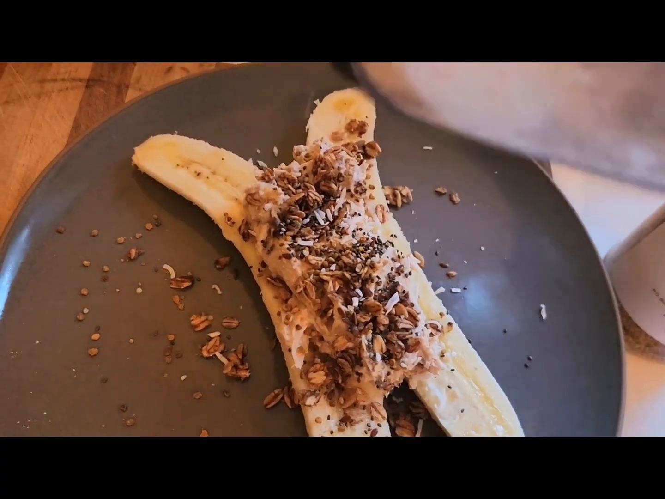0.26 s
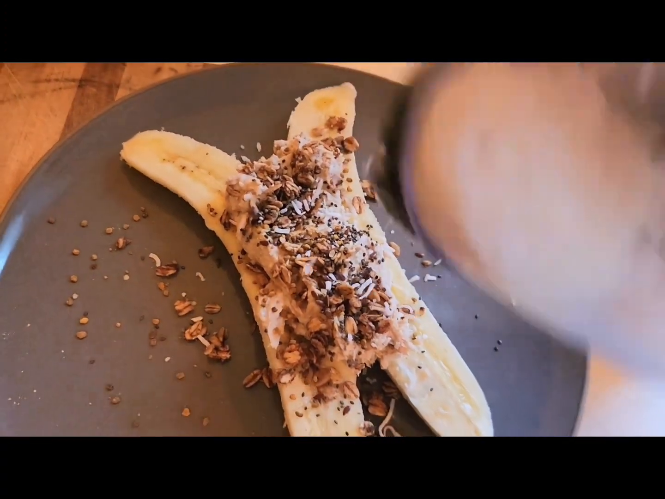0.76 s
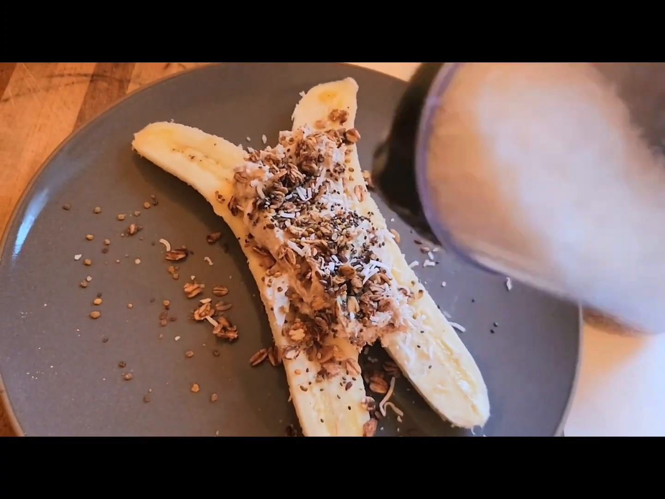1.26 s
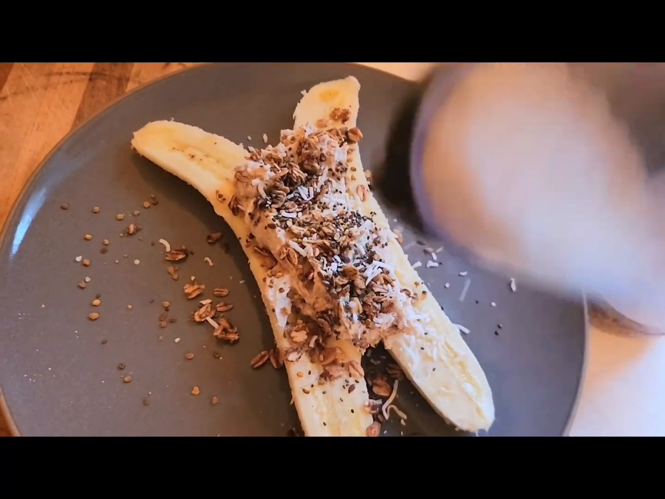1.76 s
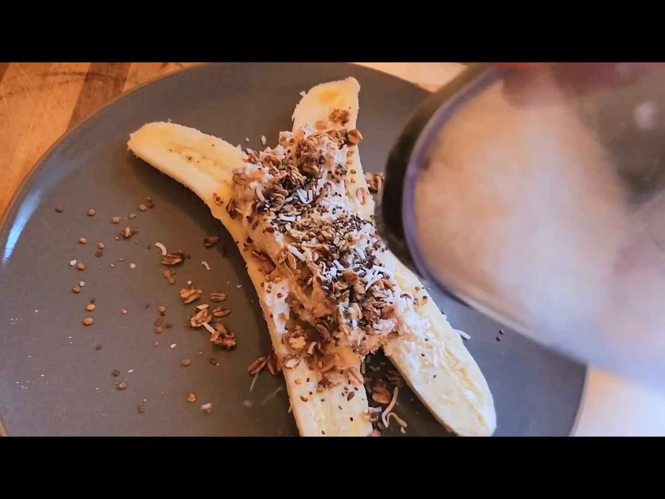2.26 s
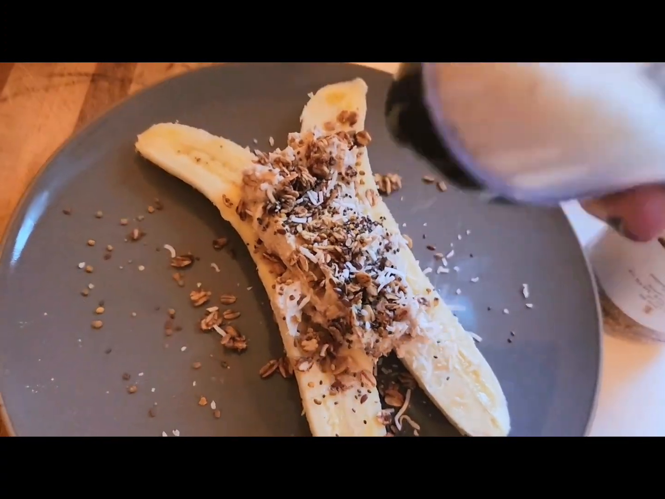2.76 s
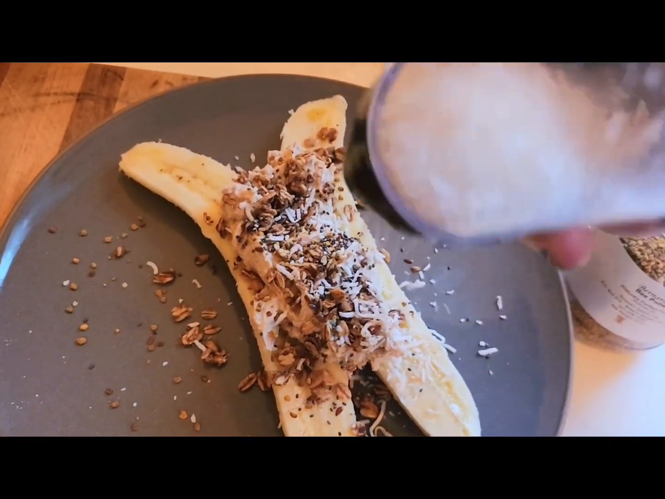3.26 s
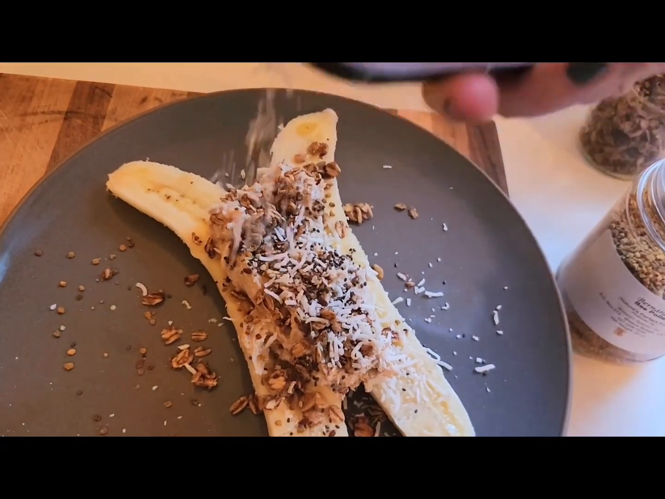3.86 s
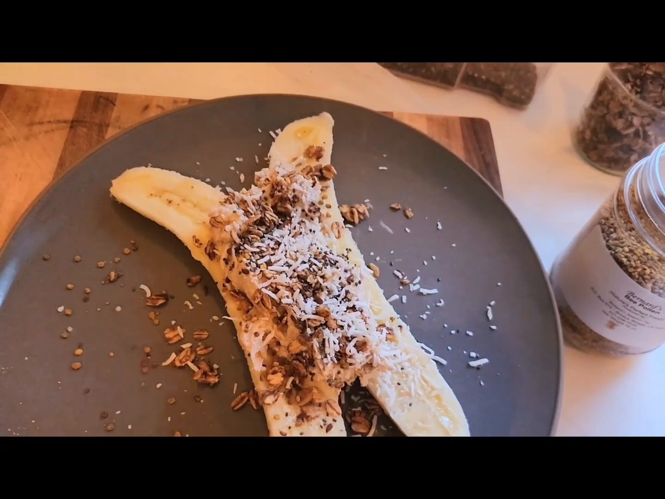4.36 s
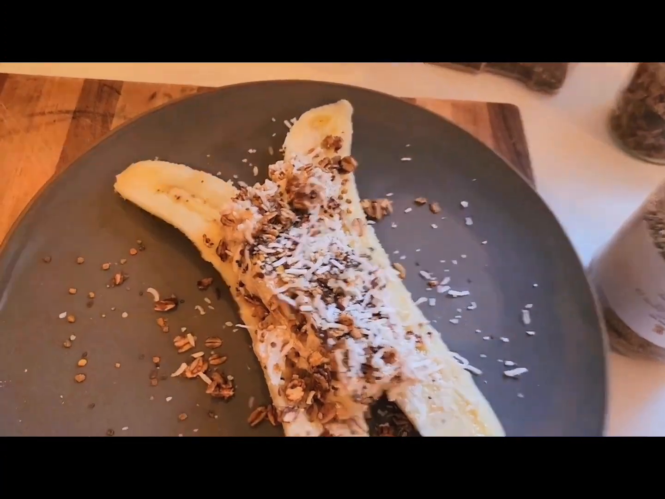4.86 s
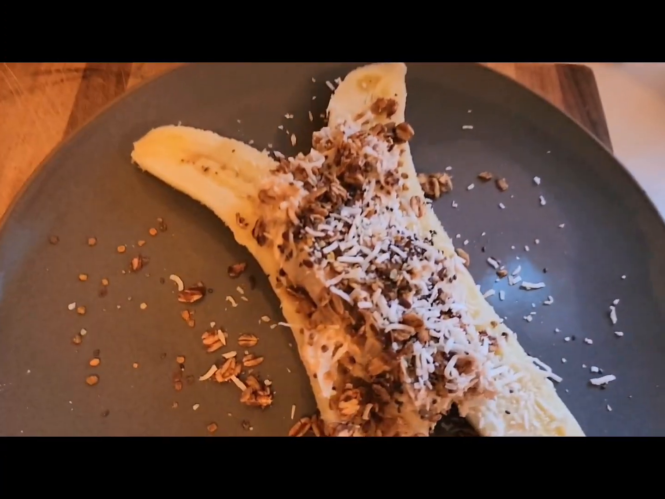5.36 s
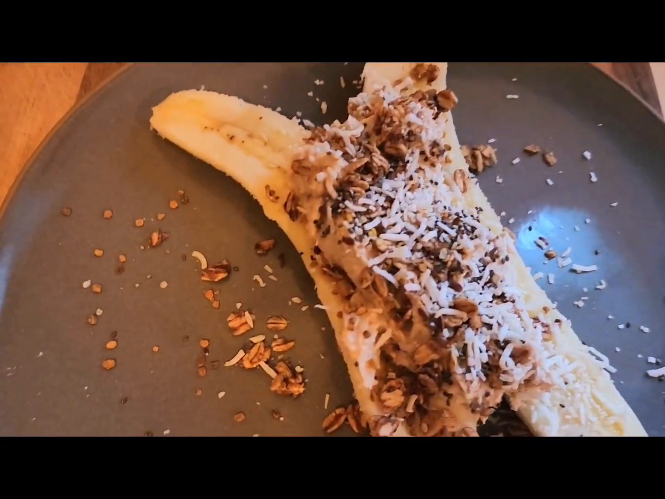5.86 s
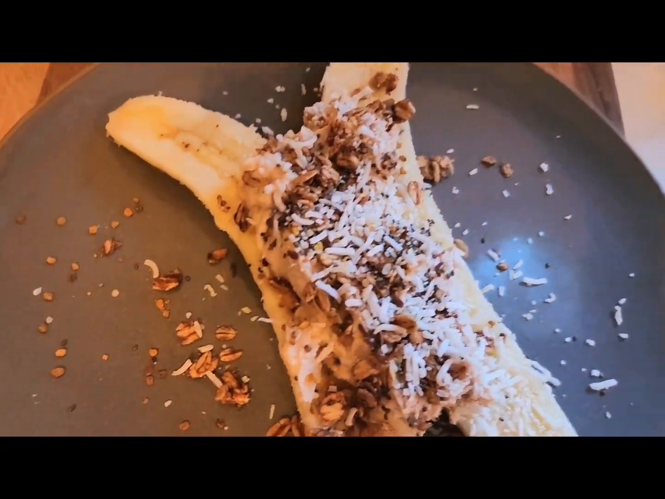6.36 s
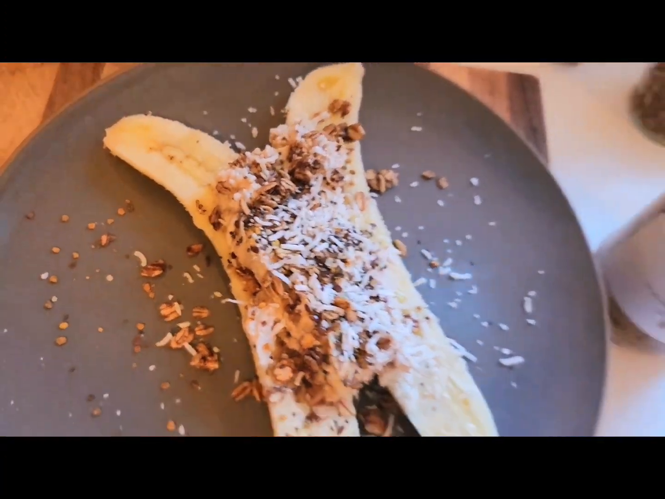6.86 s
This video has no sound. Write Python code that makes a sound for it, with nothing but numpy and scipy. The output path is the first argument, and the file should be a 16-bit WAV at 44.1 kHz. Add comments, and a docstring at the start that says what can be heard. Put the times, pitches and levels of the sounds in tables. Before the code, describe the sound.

Dry coconut shreds shaken rhythmically from a jar onto a plate, a sharp click midway, then jar, lid and wooden knocks over fridge hum.

```python
"""Dry coconut shreds are shaken in a jar onto a plate, close under a hand-held phone in a kitchen.
Enveloped noise hisses as the heap slides and rings jar wall and air; decaying modes make the plate pings.
Modes and bursts bump the phone; jar, lid and a wooden drop knock on the counter with cracks and a drag,
then soft noise rustles. Room air and the narrow noise lines and sines of a fridge hum lie behind it all."""
import sys
import numpy as np
from scipy import signal
from scipy.fft import rfft, irfft, next_fast_len
from scipy.io import wavfile
from scipy.ndimage import uniform_filter1d

SR = 44100
rng = np.random.default_rng(int(sys.argv[2]) if len(sys.argv) > 2 else 0)


def dump_mix(stems):
    """Bounce the given channels to the path in sys.argv[1] as a 16-bit WAV at rate SR."""
    frames = np.atleast_2d(stems).T  # one column per channel
    limited = np.clip(frames, -1, 1)  # hard clip at full scale
    pcm = np.round(limited * 32767).astype(np.int16)
    wavfile.write(sys.argv[1], SR, pcm)


N = 313815
TIME = np.arange(N) / SR
PORTS_ALIKE_HZ = 605
SPOT_DB, SPOT_OCTAVES = 6.5, 0.27  # modes near the favoured one ring louder

# plate modes: hz, relative_db, t60_s
PLATE_MODES = [(2040, -6, .07), (3391, 0, .07), (5010, -5, .035), (6840, -7, .06), (7185, -8, .04),
               (8979, -7, .04)]


def undb(db):
    """Gain of a level in dB."""
    return 10 ** (np.asarray(db, float) / 20)


def level(x, db):
    """Scale to an rms level."""
    return x * undb(db) / np.sqrt(np.mean(x ** 2))


def colour(x, points):
    """Shape the spectrum by (Hz, dB) points, straight lines over log frequency."""
    hz, db = np.transpose(points)
    size = next_fast_len(N)
    bins_hz = np.maximum(np.arange(size // 2 + 1) * SR / size, 1)
    gain = undb(np.interp(np.log(bins_hz), np.log(hz), db))
    return irfft(rfft(x, size) * gain, size)[..., :N]


def band(x, hz, width_hz):
    """One resonance, gain 1 at the centre."""
    return signal.lfilter(*signal.iirpeak(hz, hz / width_hz, SR), x)


def decay(t, t60):
    """Exponential fade by 60 dB in t60, in the unit of t."""
    return np.exp(-np.log(1000) * t / t60)


def walk(rate_hz):
    """Random levels, one new per 1 / rate_hz, slewed; spread a little under 1."""
    k = int(SR / rate_hz)
    held = np.repeat(rng.standard_normal(N // k + 1), k)
    return uniform_filter1d(held, k)[:N]


def ports(alike_hz):
    """Noise that is the same on both ports in the bass and unrelated in the treble."""
    mid, side = rng.standard_normal((2, N))
    side = signal.lfilter(*signal.butter(1, alike_hz, "high", fs=SR), side)
    return np.array([mid + side, mid - side])


def grains(rate_hz, spread_db, ms, bed):
    """Envelope of random tiny impacts over an even bed, rms 1."""
    struck = rng.random(N) < rate_hz / SR
    sizes = struck * undb(spread_db * rng.exponential(size=N))
    smear = np.hanning(int(ms * SR / 1000))
    return level(np.convolve(sizes, smear, "same") + bed, 0)


def bursts(starts_s, db, t60_ms, rise_ms=0.22):
    """A fading puff of noise at each time, unrelated on the two ports."""
    out = np.zeros((2, N + SR))
    t_ms = np.arange(SR // 5) * 1000 / SR
    shape = np.clip(t_ms / rise_ms, 0, 1) * decay(t_ms, t60_ms)
    for s, gain in zip(starts_s, undb(db)):
        i = int(s * SR)
        out[:, i:i + len(t_ms)] += gain * shape * rng.standard_normal((2, len(t_ms)))
    return out[:, :N]


def ring(hits, modes, rise_ms=.1, scatter_db=3.5, detune=0.0094, swing=-1):
    """Each hit rings scattered modes, neighbours opposed (swing -1) or together (near 1), phased per port."""
    out = np.zeros((2, N + SR))
    t = np.arange(SR // 3) / SR
    hz, db, t60_s = np.transpose(modes)[..., None]
    signs = swing ** np.arange(len(modes))[:, None]
    for s, hit_db, spot_hz in hits:
        a, b, c = rng.standard_normal((3, len(modes), 1))
        port_side = np.array([.5, -.5]).reshape(2, 1, 1)
        port_phase = .5 * np.minimum(hz / PORTS_ALIKE_HZ, 2) * c * port_side * 2
        port_phase = port_phase / 2
        favour_db = SPOT_DB * np.exp(-(np.log2(hz / spot_hz) / SPOT_OCTAVES) ** 2)
        gain = signs * undb(hit_db + db + scatter_db * a + favour_db)
        wave = decay(t, t60_s) * np.sin(2 * np.pi * hz * (1 + detune * b) * t + port_phase)
        i = int(s * SR)
        out[:, i:i + len(t)] += np.clip(1000 * t / rise_ms, 0, 1) * np.sum(gain * wave, axis=1)
    return out[:, :N]


def strokes():
    """Loudness of the sliding heap, and how much of it rings the air and the wall of the jar."""
    # shakes, with two faint trickles of shreds near the end; the heap slides, piles up and settles:
    # start_s, slide_s, start_db, pile_up_db, settling_db_per_s, hollow_relative_db, wall_relative_db
    slides = [(-.02, .10, -53.5, -43.5, 400, -13.5, -5.5), (0.153, 0.11, -43, -48.5, 504, -8.5, -4.5),
              (0.454, 0.11, -50.5, -39.5, 602, -12, -6), (0.615, 0.13, -44, -40, 398, -13.5, -6.5),
              (0.844, 0.059, -68.5, -54, 400, -16, -12), (0.996, 0.12, -43, -46.5, 248, -9.5, -4),
              (1.191, 0.1, -46.5, -45, 450, -13.5, -7), (1.364, 0.12, -44, -49.5, 200, -11, -4),
              (1.537, 0.12, -45, -47.5, 650, -16, -8), (1.723, 0.12, -48.5, -55, 600, -12, -4.5),
              (1.913, 0.12, -47, -45.5, 398, -12, -4), (2.098, 0.12, -45.5, -48.5, 350, -14, -5),
              (2.282, 0.13, -47, -44, 233, -11.5, -4), (2.65, 0.059, -58.5, -58.5, 223, 2, 3.5),
              (2.706, 0.059, -73, -44, 283, -12.5, -14), (2.938, 0.053, -65, -52.5, 376, -14, -24),
              (3.079, 0.13, -46, -38, 298, -11, -6), (3.285, 0.11, -50, -41, 400, -14, -3),
              (3.463, 0.077, -47, -56, 300, -16, -7), (3.521, 0.037, -43, -41, 600, -9.5, -9.5),
              (3.648, 0.043, -58, -57, 400, -11, -2), (3.698, 0.043, -55, -46.5, 400, -8, -7.5),
              (3.808, 0.12, -53.5, -59.5, 300, -9, -9), (3.979, 0.11, -52, -66, 148, -7.5, -6),
              (4.15, 0.34, -73.5, -78, 198, -6, 3.5), (4.476, 0.13, -75.5, -46, 130, -11, -5.5),
              (4.706, 0.031, -33, -40, 202, -26, 2.5), (4.754, 0.037, -58, -39, 201, -6.5, -25),
              (4.963, 0.16, -64, -68.5, 97, -19, -17)]
    attack_s = 0.018
    wall_fade_db, hollow_swell_db = -6, 4.5  # the heap damps the wall along a slide, the air tone grows
    pile_up_s, pile_up_step_db, pile_up_rise_s = .05, 4, .008  # the last part of a slide is louder
    out = np.zeros((3, N))
    for s, slide_s, start_db, end_db, settle, hollow_db, wall_db in slides:
        first = int(max(s, 0) * SR)
        since = TIME[first:int((s + slide_s + .4) * SR)] - s
        u = np.clip(since / slide_s, 0, 1)
        step = np.clip((since - slide_s + pile_up_s) / pile_up_rise_s, 0, 1)
        heap_db = start_db + (end_db - start_db) * u + pile_up_step_db * (step - 1)
        heap_db = heap_db - settle * np.maximum(since - slide_s, 0)
        heap = np.clip(since / attack_s, 0, 1) ** 2 * undb(heap_db)
        shares_db = [0 * u, hollow_db + hollow_swell_db * (u - 1), wall_db + wall_fade_db * u]
        out[:, first:][:, :len(since)] += heap * undb(shares_db)
    return out


def patchy(x, patchy_db):
    """The heap rearranges all the time, so each part of the treble swells and fades on its own."""
    out = 0
    for mid_hz in 1000 * 2 ** np.arange(0, 4.1, .4):
        part = colour(x, [(mid_hz / 1.6, -30), (mid_hz, 0), (mid_hz * 1.6, -30)])
        out = out + part * undb(patchy_db * walk(24.884))
    return out


def patter(slide):
    """Shreds rain on the plate as the heap slides: sparse noise grains excite its modes."""
    rain = slide * grains(120, 4.0, 1.5, .05) * rng.standard_normal((2, N))
    return sum(undb(6 + db) * band(rain, hz, 2.2 / t60_s) for hz, db, t60_s in PLATE_MODES)


def shreds():
    """Thousands of tiny impacts, each smeared over a millisecond or two, ring the wall and air of the jar."""
    # spectrum of the dry hiss: hz, relative_db
    hiss_points = [(530, -58.5), (900, -5.5), (1130, -30), (1550, 1), (1750, -16), (1970, -0.5), (3820, 0),
                   (7490, 3.5), (14900, -2), (16000, 4)]
    # air inside the jar: hz, width_hz, relative_db
    air_modes = [(700, 110, 6), (601.4, 20, 9)]
    # jar wall: hz, width_hz, relative_db
    wall_modes = [(1590, 170, -9), (1940, 110, -1.5), (2020, 110, -1.5), (2250, 200, -10)]
    # clumps striking the jar wall: start_s, relative_db
    clumps = [(0.1645, -38), (.18, -27), (.266, -22.5), (0.533, -22), (.564, -17.5), (0.639, -37),
              (1.0727, -19.5), (1.204, -29.5), (1.258, -33), (1.3814, -34), (1.288, -23), (1.636, -23),
              (1.749, -32.5), (1.81, -27), (1.8236, -22), (1.843, -28), (1.949, -30), (2, -29),
              (2.074, -29.5), (2.11, -26.5), (2.195, -28.5), (2.366, -25.5), (2.428, -30.5), (2.545, -30),
              (2.866, -36.5), (3.076, -38), (3.428, -32), (3.443, -32), (3.1875, -17.5), (3.213, -21.5),
              (3.359, -24), (3.5416, -29.5), (3.714, -36), (3.92, -24), (3.9414, -25.5), (4.0664, -32.5),
              (4.09, -37.5), (4.157, -50), (4.207, -49), (4.509, -40), (4.5376, -49), (4.572, -26),
              (4.7179, -18), (4.7313, -18.5), (4.878, -23)]
    slide, hollow, wall = strokes()
    heap = grains(1200, 3.0, 1.4, 1.5) * undb(np.array([[-.4], [.4]]))
    clump_s, clump_db = np.transpose(clumps)
    dry = heap * slide * rng.standard_normal((2, N))
    dry = dry + bursts(clump_s, clump_db, 13.94, rise_ms=5.34)
    wall = heap * wall * rng.standard_normal((2, N))
    hollow = heap * hollow * ports(1300.0)
    hiss = patchy(colour(dry, hiss_points), patchy_db=4.5)
    wall_tone = sum(undb(db + 6.5 * walk(25)) * band(wall, hz, w) for hz, w, db in wall_modes)
    air_tone = sum(undb(db + 3.6 * walk(18)) * band(hollow, hz, w) for hz, w, db in air_modes)
    return patter(slide) + undb(1.5) * hiss + undb(15.5) * wall_tone + undb(14.0) * air_tone


def kitchen():
    """Steady air noise under the fridge hum, whose lines are sines plus wavering narrow noise."""
    # spectrum of the air noise: hz, relative_db
    air_points = [(12, -73.5), (20, -25), (43, -4.5), (65, -4.5), (93, -15), (130, -13.5), (150, -22),
                  (172, -8), (248, -19.5), (310, -14.5), (367, -16), (472, -33.5), (513, -30), (718, -52.5),
                  (16000, -65)]
    # hum lines: hz, width_hz, relative_db
    hum_lines = [(60.3, 7.1, -50.5), (123.7, 5.7, -62), (177.7, 5.2, -68), (237.4, 32, -62.5),
                 (360, 51, -68)]
    air = level(colour(ports(PORTS_ALIKE_HZ), air_points), -56)
    steady = sum(undb(db - 2.5) * np.sin(2 * np.pi * hz * TIME) for hz, _, db in hum_lines)
    wavering = sum(level(band(ports(500.0), hz, w), db - 4.5) for hz, w, db in hum_lines)
    return air + steady + wavering


def room(x):
    """A diffuse noise tail that builds up in a millisecond; each band fades at its rate, the bass slowest."""
    # decay by band: hz, t60_s
    decays = [(300, 0.45), (1200, 0.3), (3000, 0.12), (8000, 0.33)]
    t = np.arange(SR // 2) / SR
    noise = ports(PORTS_ALIKE_HZ)[:, :len(t)] * np.clip(t / 0.00099, 0, 1)
    tail = sum(band(noise, hz, 1.8 * hz) * decay(t, t60_s) for hz, t60_s in decays)
    tail = tail / np.sqrt(np.sum(tail ** 2) / 2)
    return signal.fftconvolve(x, tail, axes=1)[:, :N]


def bumps():
    """Carried by the case, without room: nudges and thud alike on both ports, modes and rattles later left."""
    # sharp tap on the case: start_s, body_gain_db
    tap_s, tap_db = (2.6413, 3)
    # case modes: hz, signed_gain, t60_s, left_lag_ms
    body_modes = [(109, -0.52, 0.023, 0.6), (193.3, -0.035, 0.095, 0.99), (348, 0.012, 0.091, 0.017),
                  (443, 0.8, 0.0036, 0.4), (570, 0.092, 0.059, 0.42), (747, 0.028, 0.088, 0.98),
                  (1410, -0.44, 0.0071, 0.27), (3095, -0.024, 0.031, 0.3)]
    # rattles shaken loose by the tap: start_s, relative_db
    rattles = [(2.641, -15), (2.6423, -17)]
    # spectrum of the dull shudder: hz, relative_db
    thud_points = [(120, -13.5), (250, -1), (450, -7.5), (800, -19.5), (2000, -29)]
    # soft low nudges of the hand: start_s, from_hz, to_hz, level_db, length_s
    nudges = [(0.425, 67, 164, -44.5, 0.132), (2.139, 173, 105, -45, 0.089)]
    # something small ticks on after the tap: start_s, level_db
    ticks = [(2.6597, -20.5), (2.6675, -18), (2.6817, -20.5)]
    out = 0
    for hz, gain, t60_s, lag_ms in body_modes:
        since = np.maximum(TIME - tap_s - np.array([[lag_ms / 1000], [0]]), 0)
        out = out + undb(tap_db) * gain * np.sin(2 * np.pi * hz * since) * decay(since, t60_s)
    for s, from_hz, to_hz, db, length_s in nudges:
        u = np.clip((TIME - s) / length_s, 0, 1)
        cycles = length_s * (from_hz * u + (to_hz - from_hz) * u ** 2 / 2)
        out = out + undb(db) * np.sin(np.pi * u) * np.sin(2 * np.pi * cycles)
    thud = colour(bursts([tap_s], [-13.0], 230.0, rise_ms=6.0), thud_points)
    out = out + thud.sum(axis=0)
    rattle = bursts(*np.transpose(rattles), 7.8, rise_ms=1.4)
    rattle = colour(rattle, [(1000, -16.5), (3100, 16.5), (4200, 11.0), (5300, 8.5), (6300, 15.5),
                             (7500, 7), (8900, 9), (10000, -1.5), (11500, 10.5), (16000, -11.0)])
    out = out + band(bursts(*np.transpose(ticks), 7.0), 5000, 2200)
    return out + np.array([np.roll(rattle[0], int(0.001255 * SR)), rattle[1]])


def plate():
    """Single shreds tick and ping the plate, each spot favouring other modes; soft padded taps in between."""
    # single shreds: start_s, level_db, favoured_hz, others_weaker_db_per_octave
    pings = [(.72, -48, 2000, 8), (2.548, -47, 5010, 3.5), (3.996, -43, 6840, 7), (4.02, -50.5, 2000, 3),
             (4.23, -52, 7500, 7), (4.264, -46, 5100, 0), (4.322, -56.5, 3391, -5.5),
             (4.382, -58, 5010, 12), (4.444, -54, 5050, 16), (4.492, -61, 3391, -2)]
    # soft taps without a crack: start_s, level_db, hz, width_hz, t60_ms
    soft_taps = [(.929, -26.5, 824, 300, 58), (.933, -26, 1220, 400, 35), (.993, -26, 1700, 700, 14),
                 (1.5, -34, 2000, 900, 12), (2.806, -15.5, 607, 348, 22), (2.841, -24, 620, 350, 18),
                 (4.328, -34, 2000, 1000, 17), (4.722, -18, 2000, 500, 30), (4.79, -17.5, 580, 200, 49)]
    s, db, _, _ = np.transpose(pings)
    ticks = bursts(s, db + 5.5, 9.0, rise_ms=1.5)
    out = colour(ticks, [(1000, -14.0), (3000, -0.5), (16000, -2.5)])
    for s, db, spot_hz, focus in pings:
        modes = [(hz, g - focus * abs(np.log2(hz / spot_hz)), t60_s) for hz, g, t60_s in PLATE_MODES]
        out += ring([(s, db - SPOT_DB, spot_hz)], modes, rise_ms=2.5, scatter_db=2.0, detune=.004)
    for s, db, hz, width_hz, t60_ms in soft_taps:
        puff = bursts([s], [db], t60_ms, rise_ms=1.8)
        out += band(band(puff, hz, width_hz), hz, width_hz)
    return out


def knock(table, modes, rise_ms, crack_ms, crack_colour, swing=-1):
    """Each touch rings the object, with a short noise crack on top."""
    s, db, crack_db, spot_hz = np.transpose(table)
    body = ring(zip(s, db, spot_hz), modes, rise_ms, swing=swing)
    return body + colour(bursts(s, crack_db, crack_ms), crack_colour)


def jar_down():
    """The jar rocks as it is put down: dull knocks ring the counter."""
    # knocks: start_s, relative_db, crack_relative_db, favoured_hz
    touches = [(5.042, -23, -34.5, 480), (5.063, -33, -55, 580), (5.097, -22, -32.5, 340),
               (5.112, -31.5, -60, 596), (5.132, -33, -50, 350), (5.152, -36, -64, 560),
               (5.168, -40, -56, 580), (5.285, -38, -61.5, 340), (5.361, -39, -63, 338.5)]
    # counter modes: hz, relative_db, t60_s
    counter_modes = [(204, -9, 0.044), (340, -4.5, 0.12), (467, -4.5, 0.035), (516, -4.5, 0.027),
                     (570, -8.5, 0.07), (664, -10.5, 0.028), (790, -18.5, .03), (1052, -14.5, 0.016),
                     (1400, -18, .02)]
    crack = [(500, 17.5), (1500, 16.0), (4000, -0.5), (16000, -23.0)]
    return knock(touches, counter_modes, 1.2, 9.8, crack)


def lid_clatter():
    """Hard clinks, mostly the lid clattering, ring its modes."""
    # clinks: start_s, relative_db, crack_relative_db, favoured_hz
    clinks = [(5.011, -40, -42, 340), (5.262, -39.5, -45, 1800), (5.284, -32.5, -24.5, 3250),
              (5.437, -38, -52, 1070), (5.457, -44, -55, 1250), (5.472, -49, -52.5, 1150),
              (5.5, -45.5, -38, 3250), (5.506, -54, -52.5, 1950), (5.579, -36.5, -28.5, 1850),
              (5.595, -26.5, -43, 1850), (5.606, -37.5, -55, 1800), (5.619, -39, -59, 850),
              (5.634, -45, -54.5, 1900)]
    # lid modes: hz, relative_db, t60_s
    lid_modes = [(335.3, -2, 0.03), (840, -3, 0.025), (1070, -8, 0.03), (1315, -2.5, 0.036),
                 (1510, -8.5, 0.03), (1748, -0.5, 0.055), (1930, -8, 0.04), (1860, -6, 0.03),
                 (2055, -7.5, 0.034), (3250, -19, 0.018)]
    crack = [(500, 7.5), (2500, 1.5), (3300, 3.5), (5000, 1.0), (7000, 1.5), (8000, 12.5),
             (9200, 1), (11000, -3.5), (16000, -1.5)]
    return knock(clinks, lid_modes, 0.21, 13.2, crack)


def lid_drag():
    """The lid drags between its hits: rough noise grains, silent outside the span."""
    # drag: time_s, relative_db
    drag_points = [(5.249, -62), (5.36, -53), (5.496, -42.5), (5.578, -57), (5.634, -48.5), (5.736, -57),
                   (5.79, -63), (5.85, -72.5)]
    s, db = np.transpose(drag_points)
    envelope = undb(np.interp(TIME, s, db, left=-140, right=-140))
    rough = grains(300, 5.3, 13.0, 0.23) * ports(700.)
    rough = colour(rough, [(300, 3.0), (700, 4.0), (1550, 0), (1800, 12.5), (2200, -9),
                           (9000, -20.5), (16000, -30.0)])
    return level(rough, -1) * envelope


def wooden_drop():
    """A wooden drop bounces and clatters; its neighbouring modes start together."""
    # bounces: start_s, relative_db, crack_relative_db, favoured_hz
    bounces = [(6.135, -19, -31, 848), (6.141, -22.5, -52.5, 350), (6.151, -30.5, -49.5, 1600),
               (6.1685, -19.5, -43, 1000), (6.198, -38.5, -55.5, 750), (6.21, -42, -57.5, 800),
               (6.225, -28, -56, 606), (6.231, -34, -61.5, 400), (6.242, -36, -58, 646),
               (6.26, -47.5, -59, 700), (6.333, -50, -63, 696)]
    # wood modes: hz, relative_db, t60_s
    wood_modes = [(232, -18.5, 0.11), (320, -9, 0.0474), (362, -1.5, 0.057), (496, -6, 0.031),
                  (580, -5.5, 0.055), (638, -5, 0.062), (698, -4, 0.05), (770, 6.5, 0.023),
                  (875, 2.5, 0.023), (986, -4, 0.044), (1190, -1, 0.042), (1280, -2.5, 0.018),
                  (1600, -7.5, 0.03), (2060, -15.5, 0.037), (2740, -23, 0.047)]
    crack = [(500, 27.0), (2500, 14), (6900, 4.5), (7550, 14.5), (8200, 0.0), (11000, -4.5), (16000, -1.5)]
    x = knock(bounces, wood_modes, 0.81, 30.0, crack, swing=0.97)
    # high-pass takes off the low thump of modes starting together
    return signal.lfilter(*signal.butter(2, 170.0, "high", fs=SR), x)


def rustle():
    """Brief noise hisses that swell and fade under a quick random flutter."""
    # rustles: loudest_s, level_db, swell_db_per_s, fade_db_per_s
    rustles = [(5.738, -55, 900, 225), (6.75, -60.5, 70.5, 226), (7.047, -67.5, 797.5, 797)]
    swell = 0
    for s, db, rise, fall in rustles:
        swell = swell + undb(db - np.where(TIME < s, rise * (s - TIME), fall * (TIME - s)))
    hiss = colour(rng.standard_normal((2, N)), [(700, 0.0), (1400, -13.0), (6000, -6.0), (10000, -22.0)])
    return level(hiss, 0) * swell * undb(2.5 * walk(50))


def scene():
    """The counter is further off than the plate, so the room weighs more on its knocks."""
    near_wet_db, far_wet_db = -7, -4.5
    near = shreds() + plate()
    far = jar_down() + lid_clatter() + wooden_drop() + lid_drag() + rustle()
    wet = room(undb(near_wet_db) * near + undb(far_wet_db) * far)
    return near + far + wet + bumps() + kitchen()


def record(dry):
    """The phone drops the deepest bass, rounds the loudest peak and cuts the top."""
    x = np.tanh(signal.lfilter(*signal.butter(2, 35.0, "high", fs=SR), dry))
    return signal.sosfilt(signal.ellip(8, .2, 70, 15600, fs=SR, output="sos"), x)


dry = scene()
out = record(dry)
dump_mix(out)
```